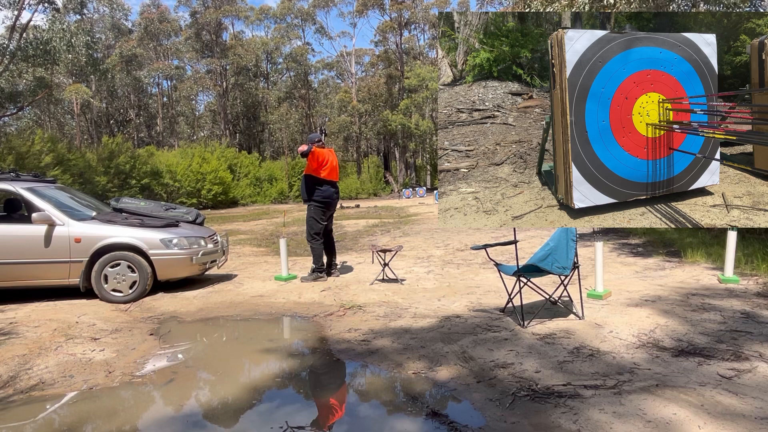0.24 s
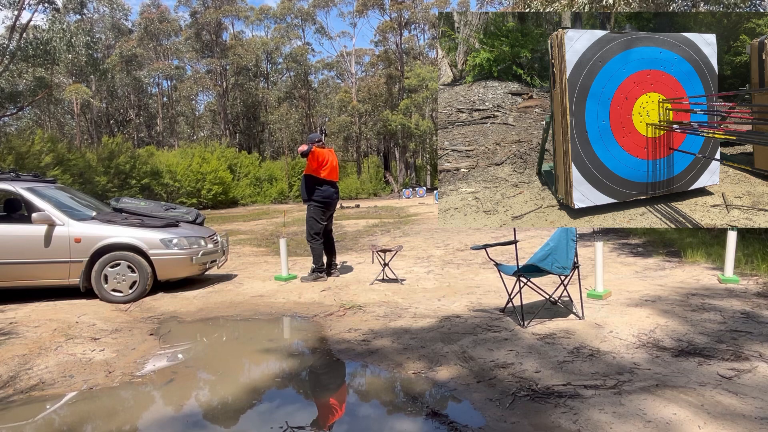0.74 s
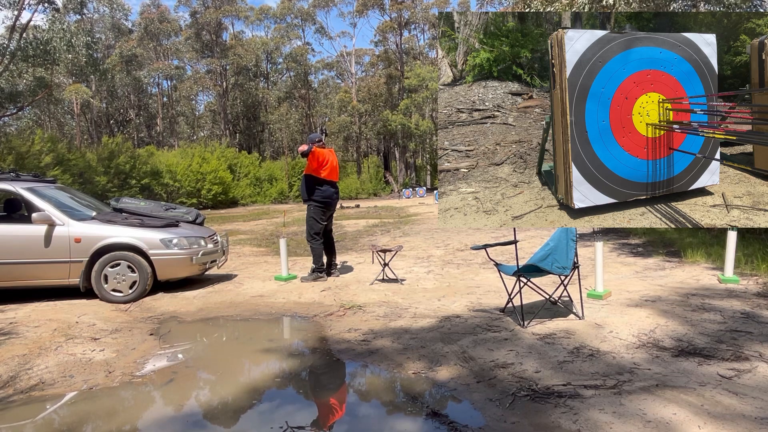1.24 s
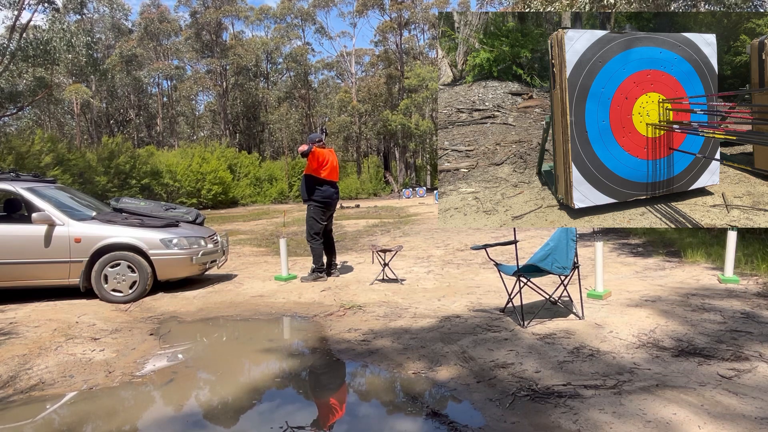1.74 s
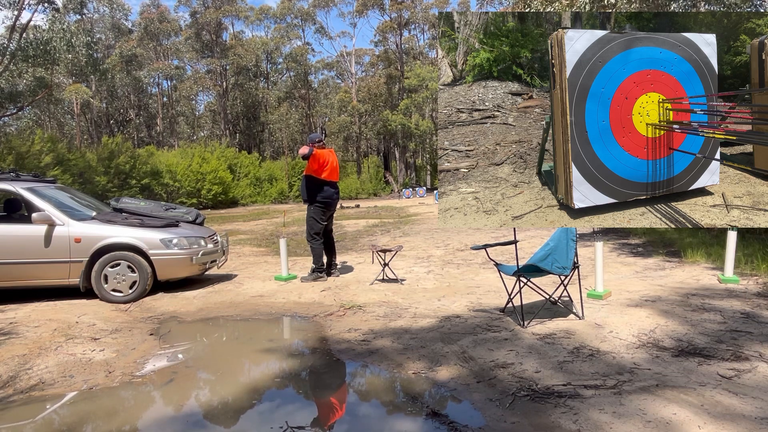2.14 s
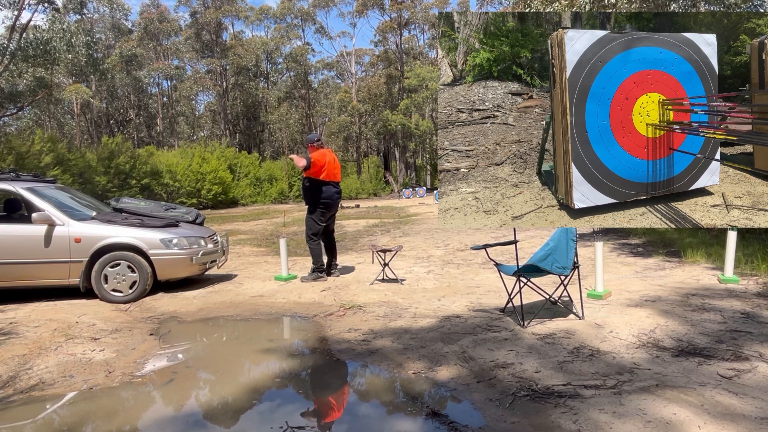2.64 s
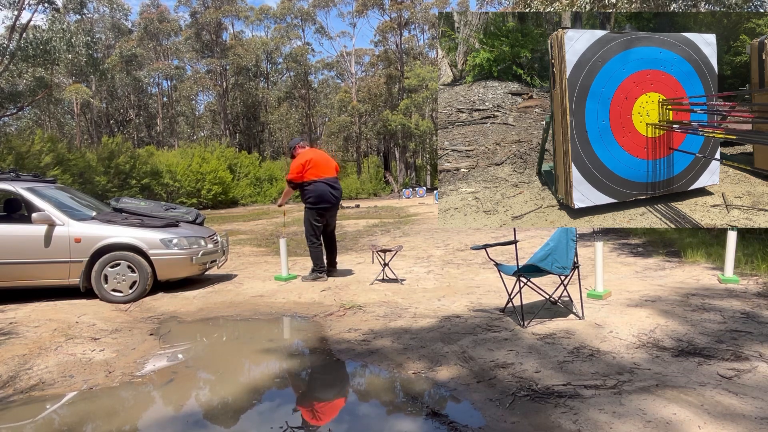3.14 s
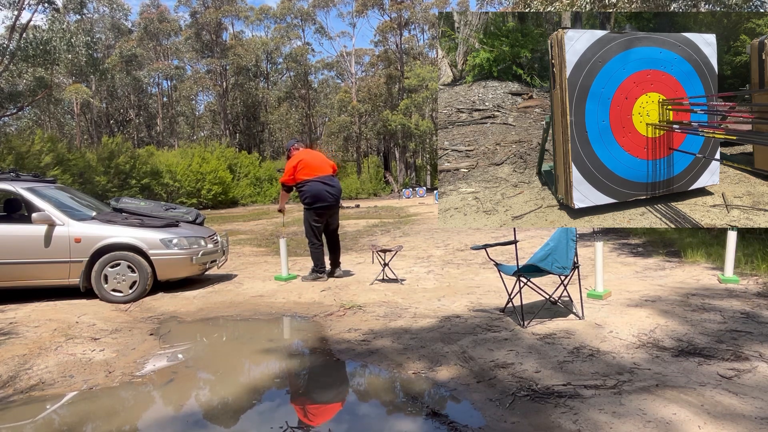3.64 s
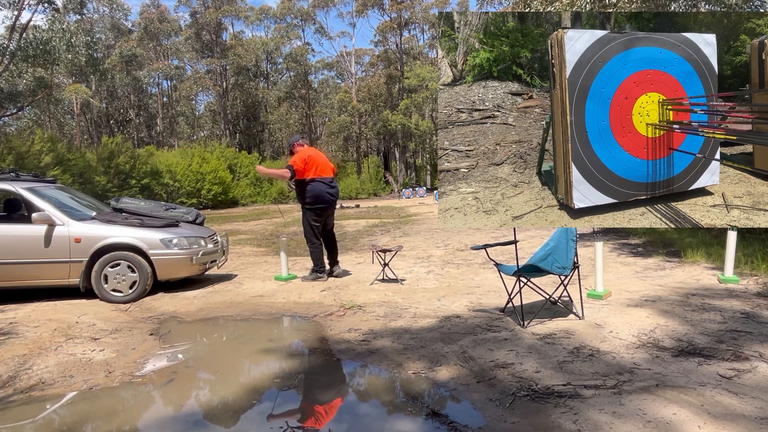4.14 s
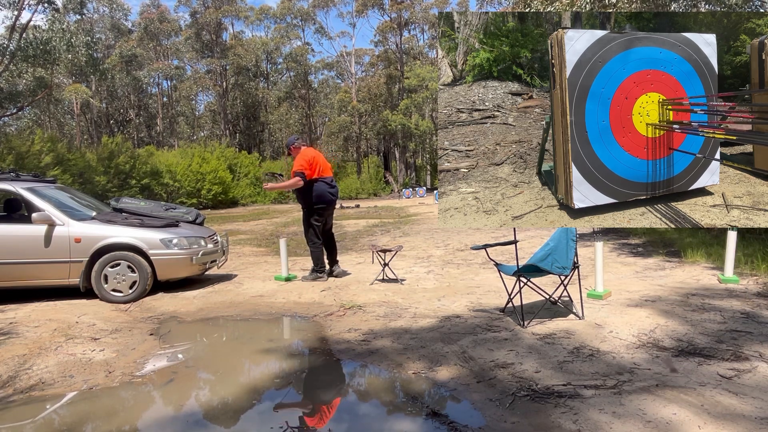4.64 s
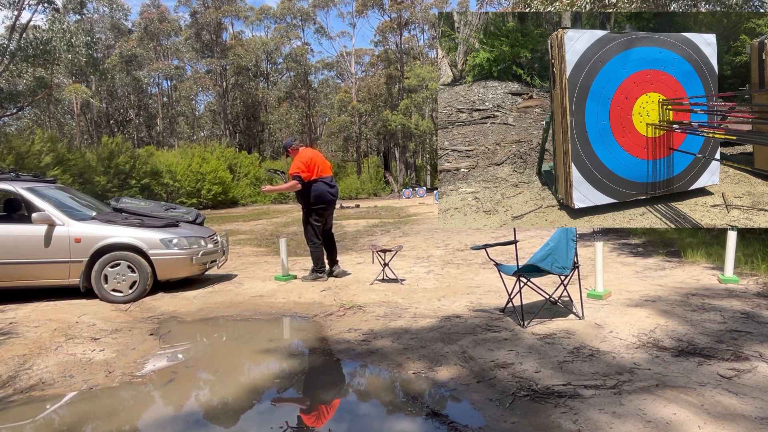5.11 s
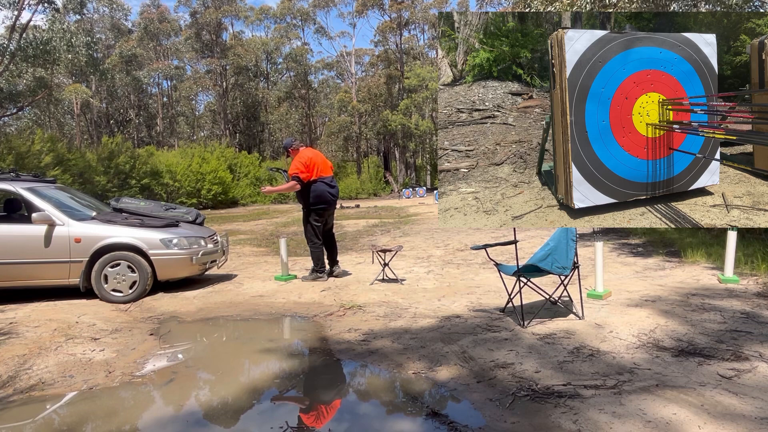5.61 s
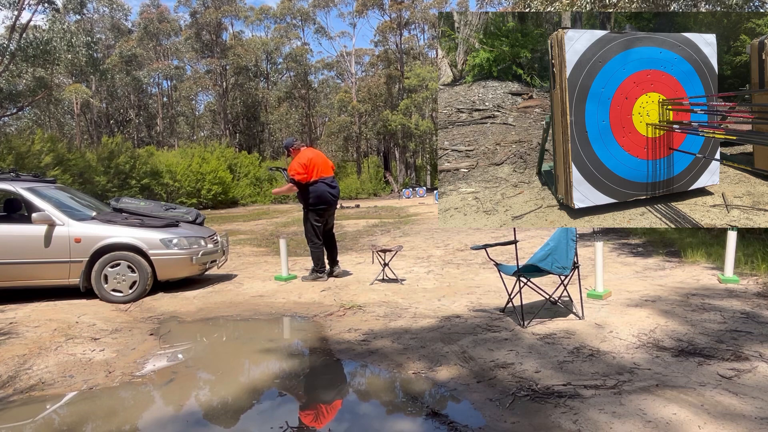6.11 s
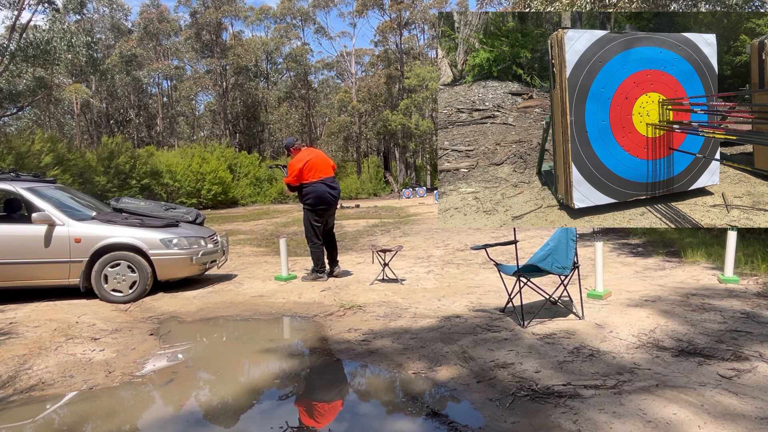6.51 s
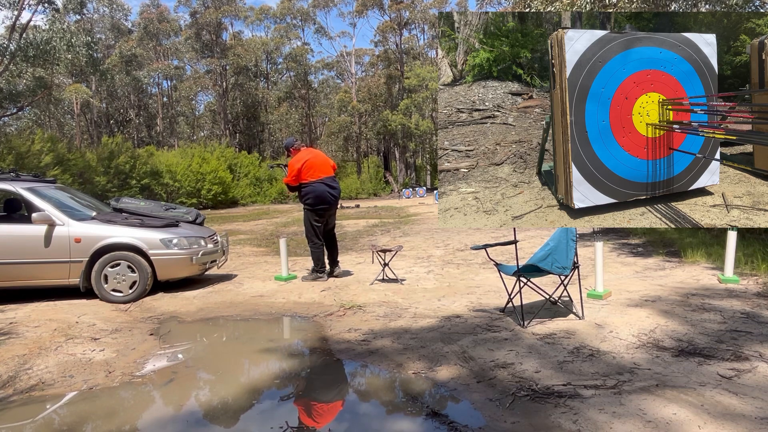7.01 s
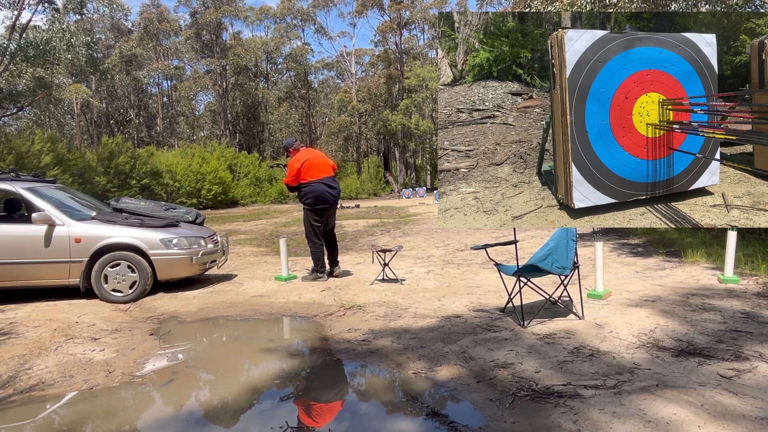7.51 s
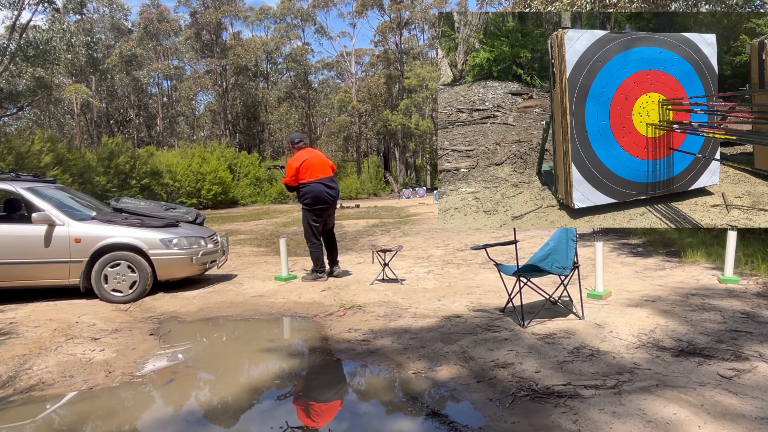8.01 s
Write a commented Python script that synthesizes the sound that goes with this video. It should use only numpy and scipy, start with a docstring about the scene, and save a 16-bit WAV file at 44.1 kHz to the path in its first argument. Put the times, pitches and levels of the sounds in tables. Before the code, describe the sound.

A songbird trills over a faint frog-like chorus; a bow snaps, an arrow hisses and cracks loudly into a target, booming through trees.

```python
"""A songbird trills over a far chorus, perhaps frogs; then an archer shoots one arrow on a bush range.
The bow snaps (noise bursts, struck modes), the arrow hisses and cracks into the boss, whose thump rolls
through the trees (decaying noise reflections); later some gear knocks. A microphone behind the archer and
one beside the target hear it at once. The songbird sings two long phrases and a second bird whistles
lower (gliding sines); low air, a hum, leaves, insects and the chorus are steady coloured noise."""
import sys
import numpy as np
from scipy import signal
from scipy.fft import rfft, irfft, next_fast_len
from scipy.io import wavfile
from scipy.ndimage import uniform_filter1d, map_coordinates

SR = 44100
rng = np.random.default_rng(int(sys.argv[2]) if len(sys.argv) > 2 else 0)


def put_to_file(sound):
    """Save the sound as 16-bit audio at rate SR, in the file named by the first command-line argument."""
    columns = np.atleast_2d(sound).T  # one column per channel
    safe = np.clip(columns, -1, 1)
    whole_steps = np.round(safe * 32767)
    wavfile.write(sys.argv[1], SR, whole_steps.astype(np.int16))


N = 364250

# Arrow, rest and fittings during the shot. Each row: start in seconds, clack in dB, hiss in dB.
BOW_CLACKS = [(1.9627, -56, -49), (1.9775, -56, -54.5), (1.9909, -41, -49.5), (1.9936, -26, -44.5),
              (2.0056, -38, -46.5), (2.108, -48, -49.5), (2.1157, -50, -53.5)]
# Colour of hisses and scuffs. Each row: frequency in Hz, relative density in dB per Hz.
HISS_COLOUR = [(1500, -19), (3000, 0.5), (5500, 4.5), (8000, -5.5), (11200, -2.5), (12500, -19),
               (15500, -16.5)]
# Arrow tip tearing into the target. Each row: start in seconds, relative level in dB, T60 in seconds.
TIP_CRACKS = [(2.3638, -10.5, 0.011), (2.3652, -9, 0.0048), (2.3659, -4.5, 0.0063), (2.3675, -16.5, 0.016),
              (2.3957, -35.5, .014)]
# The boss is driven back, then knocks on its stand. Each row: start in seconds, relative level in dB.
BOSS_BLOWS = [(2.366, 0.5), (2.396, -13)]


def from_db(db):
    """Decibels to gain."""
    return 10 ** (np.asarray(db) / 20)


def rms_one(x):
    """Scale to rms 1."""
    return x / np.sqrt(np.mean(x ** 2) + 1e-20)


def at_hz(points, hz):
    """Read a table on a log-frequency axis."""
    f, value = np.transpose(points)
    return np.interp(np.log(np.maximum(hz, 1)), np.log(f), value)


def pan(left_db):
    """Left and right gains; left_db is left level minus right level."""
    return from_db(np.array([[left_db], [-left_db]]) / 2)


def add(out, start_s, sound):
    """Mix a sound in at start_s."""
    start = round(start_s * SR)
    out[..., start:start + sound.shape[-1]] += sound[..., :N - start]


def noise(spectrum, alike, size):
    """Stereo noise of a given colour and left-right correlation; rms 1."""
    fast = next_fast_len(size)
    alike = np.clip(alike, -1, 1)
    gain = from_db(at_hz(spectrum, np.fft.rfftfreq(fast, 1 / SR)))
    white = rng.standard_normal((2, fast))
    mid, side = irfft(rfft(white) * gain, fast)[:, :size]
    return rms_one(np.sqrt(1 + alike) * mid + np.sqrt(1 - alike) * np.array([side, -side]))


def drift(rate_hz, size):
    """Random values, rate_hz of them a second, joined by straight lines; spread near 1."""
    steps = np.arange(size) / SR * rate_hz
    return np.interp(steps, np.arange(4096), rng.standard_normal(4096))


def burst(spectrum, t60_s, alike, attack_s=.00008):
    """Coloured noise with a fast attack and exponential decay, like many resonances dying together."""
    t = np.arange(SR // 2) / SR
    return noise(spectrum, alike, size=len(t)) * from_db(-60 * t / t60_s) * (1 - np.exp(-t / attack_s))


def ring(modes):
    """A struck body: decaying sines, neighbours in opposite sign."""
    t = np.arange(SR // 2) / SR
    out = np.zeros(len(t))
    for k, (hz, db, t60_s) in enumerate(modes):
        out += (-1) ** k * from_db(db - 60 * t / t60_s) * np.sin(2 * np.pi * hz * t)
    return out


def scatter(x, colour, decay, build_s, alike, patchy_db=0):
    """Countless reflections from trunks and leaves; each octave dies at its own rate, in clumps if patchy."""
    t = np.arange(int(1.2 * SR)) / SR
    echo = 0
    edges_hz = 31 * 2. ** np.arange(10)
    for low, high in zip(edges_hz, edges_hz[1:]):
        hz = np.sqrt(low * high)
        clumps = drift(4 * np.sqrt(hz), len(t))
        fall_db = patchy_db * clumps - 60 * t / at_hz(decay, hz)
        shape = from_db(fall_db) * (1 - np.exp(-t / build_s))
        octave = signal.butter(2, [low, high], "band", fs=SR, output="sos")
        band = signal.sosfilt(octave, noise([(1, 0), (SR, 0)], alike, size=len(t)))
        echo = echo + from_db(at_hz(colour, hz)) * band * shape / np.linalg.norm(shape)
    return signal.fftconvolve(x, echo, axes=1)[:, :N]


def bow():
    """The arrow hisses off the rest, the string slaps home and the limbs thud; a softer rebound follows."""
    # Each row: frequency in Hz, relative density in dB per Hz.
    clack_colour = [(210, -31), (350, -12), (522, -9.5), (712, 0), (1180, -2.5), (1540, -12), (2100, -1),
                    (2260, -9.5), (2430, 1.5), (2650, -8.5), (5240, -24), (8670, -30), (10700, -21.5),
                    (12000, -36.5), (15600, -56), (22000, -120)]
    # The string slaps the limbs. Each row: start in seconds, relative level in dB.
    string_slaps = [(1.9935, -37), (2.0035, -47.5), (2.0185, -41.5), (2.1092, -47.5), (2.1163, -43),
                    (2.1235, -54)]
    # What each slap rings with. Each row: frequency in Hz, relative level in dB, T60 in seconds.
    string_modes = [(575, -1.5, .045), (658, -3.5, 0.046), (719.5, 0.5, .055), (775, 1.5, 0.058),
                    (837, -6, .04), (920, -5.5, .04), (967, -1, .045), (1080, -7.5, 0.045),
                    (1150, -5, 0.038), (1248, -8.5, .04)]
    # The limbs stop, then rebound. Each row: start in seconds, relative level in dB.
    limb_thuds = [(1.9969, -32), (2.11, -34.5)]
    # Limbs and riser. Each row: frequency in Hz, relative level in dB, T60 in seconds.
    limb_modes = [(88, -2.5, .085), (134, 2, 0.035), (205, -5, 0.051), (280, -7.5, .05), (404, -9.5, .05)]
    out, body = np.zeros((2, 2, N))
    for start_s, clack_db, hiss_db in BOW_CLACKS:
        add(out, start_s, from_db(clack_db) * burst(clack_colour, t60_s=0.05, alike=.4) * pan(4.3))
        add(out, start_s, from_db(hiss_db) * burst(HISS_COLOUR, t60_s=0.3, alike=0.18) * pan(-1.2))
    for start_s, db in string_slaps:
        add(body, start_s, from_db(db) * ring(string_modes) * pan(2.494))
    for start_s, db in limb_thuds:
        add(body, start_s, from_db(db) * ring(limb_modes))
    out = out + body
    near = scatter(out, [(200, -16), (1000, -13), (4500, -2.0), (12000, -15.5)],
                   [(200, 0.22), (5000, 0.1), (12000, 0.51)], build_s=0.0026, alike=0.19, patchy_db=1.0)
    trees = scatter(body, [(100, -18), (300, -9.5), (1000, -16)], [(100, .7), (1000, .65)],
                    build_s=.03, alike=.5)
    return out + near + trees


def arrow(near_s, falloff):
    """The vanes hiss, swelling steeply as the arrow closes on the target's microphone."""
    leaves_bow_s, lands_s = BOW_CLACKS[3][0], TIP_CRACKS[0][0]
    to_go_s = np.arange(int((lands_s - leaves_bow_s) * SR))[::-1] / SR
    out = np.zeros((2, N))
    vane_colour = [(400, -7.0), (2000, 4.5), (6000, 0), (9000, -15.0), (15000, -16.0)]
    vanes = noise(vane_colour, alike=.4, size=len(to_go_s))
    add(out, leaves_bow_s, from_db(-26.0) * vanes * (near_s / (near_s + to_go_s)) ** falloff)
    return out


def shove(width_s):
    """One slow push and pull of air as the face of the boss gives way."""
    u = np.arange(SR // 20) / SR / width_s - 3
    return -u * np.exp(-u ** 2 / 2)


def target():
    """The tip bursts through face and packing within a few milliseconds; the whole boss then booms."""
    # Each row: frequency in Hz, relative density in dB per Hz.
    crack_colour = [(400, -22.5), (700, -10), (950, -1.5), (1260, -1.5), (1800, -2.5), (2600, -2.5),
                    (3200, -17.5), (3800, -8), (5200, -1.5), (6400, 2), (7400, 1), (9200, -12.5),
                    (11000, -5), (13200, -26.5), (16000, -23.5)]
    # Boss and stand. Each row: frequency in Hz, relative level in dB, T60 in seconds.
    boss_modes = [(48, -41.5, 0.2), (76.5, -28, 0.16), (105, -26, 0.16), (180, -17.5, 0.072),
                  (228, -7.5, 0.063), (287.5, -13, 0.07), (399.8, -17.5, 0.05), (448.5, -22, 0.045),
                  (508, -30, 0.024), (820.4, -30.5, .035), (1240, -20, 0.025), (1590, -28.5, 0.022),
                  (1820, -31.5, 0.037), (2570, -27.5, 0.019)]
    # Dull crush of the packing. Each row: frequency in Hz, relative density in dB per Hz.
    packing_colour = [(25, -7.5), (60, -1), (130, 5), (200, 4.5), (330, 5), (480, -7.5), (650, -11),
                      (1100, -16), (2000, -39.5)]
    # The stand rattles once the boss has struck it. Each row: start in seconds, relative level in dB.
    stand_rattles = [(2.4002, -26.5), (2.452, -41.5), (2.488, -64)]
    # Frame of the stand. Each row: frequency in Hz, relative level in dB, T60 in seconds.
    stand_modes = [(307.6, -1.5, 0.072), (364.7, -6, 0.031), (439.5, 1.5, 0.049), (500, -5.5, 0.024)]
    out, crush = np.zeros((2, 2, N))
    for start_s, db, t60_s in TIP_CRACKS:
        add(out, start_s, from_db(db) * burst(crack_colour, t60_s, alike=0.2))
    for start_s, db in BOSS_BLOWS:
        add(out, start_s, from_db(db) * ring(boss_modes) * pan(.5))
        add(out, start_s, from_db(db - 25.0) * shove(width_s=0.0035))
        packing = burst(packing_colour, t60_s=0.2, alike=1.0, attack_s=0.0011)
        add(crush, start_s, from_db(db - 24.5) * packing)
    for start_s, db in stand_rattles:
        add(out, start_s, from_db(db) * ring(stand_modes))
    return out + crush + forest_roll()


def forest_roll():
    """The hit leaves the boss as one sharp pulse, which the trees return as a rough, uneven boom."""
    # Each row: frequency in Hz, relative level in dB.
    roll_colour = [(45, 3), (90, 10.5), (175, 15.5), (350, 4.5), (700, -5), (1400, -7.5), (2800, -12.5),
                   (5600, -9.5), (11000, -22.5)]
    # Each row: frequency in Hz, T60 in seconds.
    roll_decay = [(50, 2.4), (170, 1.3), (350, .92), (700, 0.97), (1500, 1.2), (5000, 0.6), (11000, 0.44)]
    top_hz = 11400   # the roll is dull: little is left above this
    pulse = np.zeros((2, N))
    add(pulse, BOSS_BLOWS[0][0], np.ones(1))
    pulse = signal.sosfilt(signal.butter(8, top_hz, fs=SR, output="sos"), pulse + 1e-18)
    roll = scatter(pulse, roll_colour, roll_decay, build_s=.02, alike=0.37, patchy_db=1.5)
    return roll + far_echoes(pulse, smear_s=0.0094)


def far_echoes(x, smear_s):
    """Banks and stands of trees each send back one dull, smeared echo."""
    # Each row: delay in seconds, relative level in dB.
    echo_delays = [(.083, 0.5), (0.146, 0), (.25, -17), (.315, -12.5), (.475, -13), (0.536, -14),
                   (.72, -19)]
    # Each row: frequency in Hz, relative level in dB.
    echo_colour = [(60, -4.5), (150, 0.5), (300, 2.5), (480, -13.5), (950, -21), (1500, -28), (4000, -33),
                   (9000, -54.5)]
    t = np.arange(SR // 8) / SR
    swell = t * np.exp(-t / smear_s)
    swell = swell / np.linalg.norm(swell)
    response = np.zeros((2, N))
    for delay_s, db in echo_delays:
        add(response, delay_s, from_db(db) * noise([(1, 0), (SR, 0)], alike=.6, size=len(t)) * swell)
    size = next_fast_len(N + SR)
    gain = from_db(at_hz(echo_colour, np.fft.rfftfreq(size, 1 / SR)))
    return irfft(rfft(x, size) * rfft(response, size) * gain, size)[:, :N]


def gear():
    """Light knocks and scuffs as the archer reaches for the next arrow, and a soft, deep bump."""
    # Gear being handled. Each row: start in seconds, knock in dB, hiss in dB.
    gear_knocks = [(2.705, -60.5, -81), (2.744, -55, -82), (3.274, -58.5, -73), (3.9004, -40, -47),
                   (3.904, -43, -69), (3.974, -62, -71), (4.02, -58, -65), (7.842, -87.5, -53)]
    # Each row: frequency in Hz, relative density in dB per Hz.
    knock_colour = [(76, -33.5), (130, -31), (234, -3), (308, -9), (420, -7), (646, -9.5), (1310, -7),
                    (1820, -12), (2990, -4), (3440, -47), (3810, -46), (6280, -21), (8000, -38),
                    (10400, -45), (17600, -120)]
    # Each row: frequency in Hz, relative level in dB, T60 in seconds.
    knock_modes = [(198.3, -15.5, 0.29), (1260, -2, 0.027), (2330, -8, .02), (3050, -7, 0.039)]
    # The archer shifts. Each row: frequency in Hz, relative level in dB, T60 in seconds.
    bump_modes = [(66.9, 3, 0.16), (88, -6, 0.08)]
    bump_s, bump_db = 4.145, -59
    out, bump = np.zeros((2, 2, N))
    for start_s, knock_db, hiss_db in gear_knocks:
        knock = burst(knock_colour, t60_s=0.042, alike=0.56, attack_s=0.0011) + ring(knock_modes)
        add(out, start_s, from_db(knock_db) * knock)
        add(out, start_s, from_db(hiss_db) * burst(HISS_COLOUR, t60_s=0.056, alike=0.089))
    add(bump, bump_s, from_db(bump_db) * ring(bump_modes))
    near = scatter(out, [(200, -11), (4000, -5), (11000, -3)], [(200, 0.21), (8000, 0.4)],
                   build_s=0.0036, alike=.2, patchy_db=13)
    return out + bump + near


def birds():
    """The songbird is louder on the right; the further a bird, the more of it comes by way of the trees."""
    # Second bird. Each row: start and length in seconds, four pitches along the note in Hz,
    # relative level in dB.
    low_notes = [(4.3, 0.11, 3270, 3480, 3760, 3760, -68.5), (4.875, 0.17, 2460, 3106, 3360, 3435, -53),
                 (5.166, 0.049, 2070, 2760, 3506, 4530, -47.5), (5.272, 0.079, 3320, 2555, 2260, 2020, -50),
                 (5.452, 0.11, 2410, 2540, 2690, 2804, -45.5),
                 (5.683, 0.076, 2002, 2770, 3920, 5320, -44.5)]
    # Thin glides from deep in the trees. Each row: start and length in seconds,
    # five pitches along the note in Hz, relative level in dB.
    far_notes = [(3.034, 0.013, 6990, 5660, 6960, 5870, 7020, -60.5),
                 (3.275, 0.051, 6420, 6580, 6050, 6560, 6500, -69.5),
                 (3.404, 0.021, 6130, 5970, 5650, 5300, 5180, -64),
                 (3.428, 0.092, 5600, 5440, 5650, 5600, 5740, -67),
                 (3.592, 0.071, 6130, 6500, 6900, 6520, 6600, -66),
                 (3.729, 0.064, 6100, 5800, 5340, 4770, 5280, -64),
                 (3.86, 0.069, 5960, 6220, 6780, 6330, 7160, -64.5),
                 (3.97, 0.085, 6070, 5760, 5140, 4910, 5400, -64),
                 (4.121, 0.094, 7150, 7560, 8230, 7540, 7500, -68.5),
                 (4.45, 0.046, 6220, 6070, 5950, 5795, 5330, -60),
                 (4.655, .06, 6040, 5900, 5500, 5800, 5600, -61)]
    slurred, zigzag = slurred_song(), zigzag_song()
    low = slurs(low_notes, taper=0.5, waver=0.0052, flutter_db=6.0, throat_db=5.5) * from_db(-3.0)
    far = slurs(far_notes, taper=0.12, waver=0.0242, flutter_db=3.5, throat_db=-1.5) * pan(-8.0)

    song = slurred + zigzag
    direct = place(song + near_echoes(song), left_db=-10.5, lead_s=.00047)
    direct = direct + place(low, left_db=0.0, lead_s=.00034)

    spread = (slurred * from_db(-5.0) + zigzag * from_db(-6.5)) * pan(-3.0)
    spread = spread + low * from_db(3.0) * pan(-.7)
    trees = scatter(spread, [(2800, -6.5), (5600, -0.5), (11000, 3.5)], [(2500, 0.54), (7000, 0.88)],
                    build_s=0.0013, alike=0.11, patchy_db=0.5)
    depths = scatter(far, [(4000, 5.2), (8000, 3.2)], [(4000, 0.75), (8000, 0.82)],
                     build_s=0.0024, alike=0.12)
    return direct + far * from_db(-1.0) + trees + depths


# The songbird's two phrases each run through three motifs, every one repeated:
# dip-buzz-hold, then ripple-slide-buzz, then cascade-hook-arch.
def slurred_song():
    """The songbird's smooth syllables: dips, holds, slides, hooks, arches and flourishes."""
    # Shapes: semitones from the note's pitch, evenly spaced in time.
    # Notes, each row: start and length in seconds, pitch in Hz, relative level in dB.
    # Whistles that dip and recover.
    dip_shape = [3.6, 2, -1.3, -5.6, -1, 1.4, 1.3, .7, -.5]
    dip_notes = [(0.2234, 0.056, 5340, -57.5), (0.4847, 0.039, 5690, -49), (0.7549, 0.046, 5670, -48.5),
                 (1.0055, 0.036, 5690, -44), (4.2263, 0.055, 5530, -47), (4.498, 0.05, 5980, -43.5),
                 (4.7791, 0.045, 5660, -40.5), (5.0691, 0.043, 5930, -38)]
    # Whistles that leap up and stay high.
    hold_shape = [-5, -.6, 1, -.1, .7, -.2, .4, -.3, .1, -.3, -.2]
    hold_notes = [(0.3796, 0.063, 7000, -63.5), (0.637, 0.055, 7180, -61.5), (0.9058, 0.046, 6960, -58),
                  (4.371, 0.069, 7180, -51.5), (4.6508, 0.074, 7490, -50), (4.9274, 0.077, 7530, -50)]
    # Whistles that slide down.
    slide_shape = [1.4, 2.4, .3, -.3, -.6, -1]
    slide_notes = [(1.2133, 0.036, 5570, -49), (1.4057, 0.042, 5680, -47), (1.591, 0.049, 5630, -47.5),
                   (5.2722, 0.032, 5890, -39), (5.456, 0.046, 5740, -42), (5.6696, 0.032, 5420, -37.5)]
    # Short rounded whistles.
    arch_shape = [-2.2, -.3, .6, .5, -.4, -1.5]
    arch_notes = [(1.852, 0.025, 5710, -50), (2.2147, 0.026, 5580, -50.5), (2.5833, 0.023, 5600, -52),
                  (2.768, 0.035, 5790, -63.5), (5.9445, 0.024, 6170, -40.5), (6.1225, 0.028, 6200, -41),
                  (6.303, 0.027, 6200, -41.5), (6.435, 0.021, 4400, -46), (6.479, 0.027, 5840, -43.5),
                  (6.6565, 0.023, 5950, -40), (6.804, 0.017, 4090, -49), (6.847, 0.025, 6240, -53),
                  (7.002, 0.0084, 4330, -49), (7.196, 0.016, 4110, -54)]
    # Freer sweeps, mostly upward, as the song winds down. Each row: start and length in seconds,
    # five pitches along the note in Hz, relative level in dB.
    flourish_notes = [(7.038, 0.018, 3750, 4500, 5360, 6650, 8200, -46),
                      (7.057, 0.0032, 7850, 6800, 5900, 5050, 4200, -46),
                      (7.244, .026, 5590, 5950, 6300, 6530, 5250, -53.5),
                      (7.428, 0.017, 4014, 4800, 5170, 5620, 5800, -51.5)]
    out = whistles(dip_notes, dip_shape, taper=0.072, throat_db=38.0, swell_db=1)
    out += whistles(hold_notes, hold_shape, taper=0.11, throat_db=7.0)
    out += whistles(slide_notes, slide_shape, taper=.22, throat_db=17.5)
    out += hooks(taper=0.42, peak_db=9.5, rise_db=-7.0) * from_db(-5.5)
    out += whistles(arch_notes, arch_shape, taper=0.56, throat_db=24.0)
    out += slurs(flourish_notes, taper=0.28, waver=0.0098, flutter_db=3.5, throat_db=27)
    return out * from_db(-2.0)


def zigzag_song():
    """The songbird's fast zigzag syllables: buzzes, ripples and cascades."""
    out = buzzes(sweep_hz=4780, narrowing=0.22, unsteady=.12, taper=0.52) * from_db(-2.5)
    out += ripples(sweep_hz=2720, lead_s=0.00808, sharpness=1.5, peak_dip_db=15.5, taper=0.27)
    out += cascades(peak_dip_db=10, break_db=7, taper=0.07)
    return out * from_db(-2.0)


def tone(hz, level_db, taper, waver, flutter_db):
    """A bird's near-pure note, swelling in and out, never quite steady."""
    size = len(hz)
    phase = 2 * np.pi * np.cumsum(hz * (1 + waver * drift(350, size))) / SR
    swell = signal.windows.tukey(size, np.clip(taper, 0, 1))
    return np.sqrt(2) * from_db(level_db + flutter_db * drift(150, size)) * swell * np.sin(phase)


def slurs(notes, taper, waver, flutter_db, throat_db, swell_db=0):
    """Notes glide through their pitches, losing throat_db per octave away from the median pitch."""
    out = np.zeros(N)
    for start_s, length_s, *pitches_hz, db in notes:
        along = np.linspace(0, len(pitches_hz) - 1, int(length_s * SR))
        hz = map_coordinates(np.array(pitches_hz, float), [along], order=3, mode="nearest")
        away_octaves = np.abs(np.log2(hz / np.median(hz)))
        level_db = db - throat_db * away_octaves + swell_db * (along / along[-1] - .5)
        add(out, start_s, tone(hz, level_db, taper, waver, flutter_db))
    return out


def whistles(notes, shape, taper, throat_db, swell_db=0):
    """One syllable sung again and again, stretched to each note's length and moved to its pitch."""
    ratios = 2 ** (np.array(shape) / 12)
    sung = [(start_s, length_s, *(hz * ratios), db) for start_s, length_s, hz, db in notes]
    return slurs(sung, taper, waver=0.015, flutter_db=2.67, throat_db=throat_db, swell_db=swell_db)


def hooks(taper, peak_db, rise_db):
    """A quick flick, soft on the way up and full on the way down, then falls towards a low tail."""
    # Each row: start and length in seconds, peak and tail in Hz, relative level in dB.
    hook_notes = [(1.788, 0.028, 5750, 3580, -55), (2.16, 0.051, 5430, 4100, -55.5),
                  (2.532, 0.017, 5800, 3690, -52), (2.709, 0.036, 5770, 4020, -57.5),
                  (5.886, 0.024, 6000, 4050, -45), (6.066, 0.021, 6150, 3964, -45),
                  (6.24, 0.022, 6280, 3474, -49.5), (6.42, 0.018, 6460, 4000, -52.5),
                  (6.602, 0.027, 6560, 4190, -46), (6.784, 0.013, 6020, 3700, -46),
                  (6.978, 0.013, 6390, 3940, -53), (7.177, 0.013, 6240, 3820, -51),
                  (7.365, 0.014, 5810, 3705, -54), (7.555, 0.016, 5560, 3590, -61)]
    rise_s, fall_s, settle_s = .0065, .0065, .008
    start_share, knee_share = 0.42, .66   # pitch before and after the flick, as shares of the peak
    out = np.zeros(N)
    corners_s = np.cumsum([0, rise_s, fall_s, settle_s])
    for start_s, length_s, peak_hz, tail_hz, db in hook_notes:
        t = np.arange(int(length_s * SR)) / SR
        corners_hz = [start_share * peak_hz, peak_hz, knee_share * peak_hz, tail_hz]
        hz = uniform_filter1d(np.interp(t, corners_s, corners_hz), size=90)
        level_db = db + np.interp(t, corners_s, [rise_db, peak_db, 0, 0])
        add(out, start_s, tone(hz, level_db, taper, waver=0.01202, flutter_db=3.0))
    return out


def zigzag_shape(t, rate, sharpness):
    """1 at each peak of a zigzag, 0 in its troughs; sharper means thinner peaks."""
    return (1 - np.abs(np.sin(np.pi * rate * t))) ** sharpness


def thinning_db(hz):
    """Level lost at the top and the bottom of the songbird's range."""
    bottom_hz, top_hz, fade_db_per_octave = 5050, 6770, 34.5
    above_octaves = np.maximum(np.log2(hz / top_hz), 0)
    below_octaves = np.maximum(np.log2(bottom_hz / hz), 0)
    return fade_db_per_octave * (above_octaves + below_octaves)


def buzzes(sweep_hz, narrowing, unsteady, taper):
    """The pitch saws unevenly up and down with sharp turns, over a narrowing range."""
    # Wide, low zigzags. Each row: start and length in seconds, base pitch in Hz, relative level in dB.
    buzz_notes = [(0.1416, 0.028, 5530, -57.5), (0.334, 0.021, 4750, -71), (0.566, 0.024, 4220, -60),
                  (0.834, 0.029, 4460, -57.5), (1.075, 0.053, 4330, -54.5), (1.271, 0.043, 5070, -51),
                  (1.469, 0.031, 4970, -53.5), (1.658, 0.047, 5160, -58.5), (4.307, 0.034, 4400, -47.5),
                  (4.577, 0.034, 4560, -49), (4.86, 0.0341, 4300, -46), (5.138, 0.036, 4480, -45),
                  (5.335, 0.021, 4880, -44.5), (5.529, 0.025, 5080, -40.5), (5.7455, 0.052, 5100, -43)]
    mean_sweeps_per_s, first_peak_s = 81, .0056
    out = np.zeros(N)
    for start_s, length_s, base_hz, db in buzz_notes:
        t = np.arange(int(length_s * SR)) / SR
        uneven_s = np.cumsum(1 + unsteady * drift(80, len(t))) / SR
        cycles = mean_sweeps_per_s * (uneven_s - first_peak_s)
        saw = uniform_filter1d(np.abs(2 * (cycles % 1) - 1), size=60)
        hz = base_hz + sweep_hz * ((1 - narrowing * t / length_s) * saw - .08)
        add(out, start_s, tone(hz, db - thinning_db(hz), taper, waver=0.012, flutter_db=4.5))
    return out


def ripples(sweep_hz, lead_s, sharpness, peak_dip_db, taper):
    """After a short lead-in the pitch flicks to sharp peaks; it is loudest in the troughs."""
    # Slower zigzags at the top of the voice. Each row: start and length in seconds, trough in Hz,
    # sweeps per second, relative level in dB.
    ripple_notes = [(1.135, 0.05, 7470, 110, -57.5), (1.337, 0.045, 7340, 60, -59.5),
                    (1.53, 0.05, 7180, 77, -58), (5.1986, 0.044, 7170, 65, -47.5),
                    (5.383, 0.054, 7730, 63, -49), (5.591, 0.041, 7540, 49, -44.5)]
    out = np.zeros(N)
    for start_s, length_s, trough_hz, rate, db in ripple_notes:
        t = np.arange(int(length_s * SR)) / SR
        flick = zigzag_shape(t - lead_s, rate, sharpness)
        hz = trough_hz + sweep_hz * flick
        add(out, start_s, tone(hz, db - peak_dip_db * flick, taper, waver=0.012, flutter_db=2.5))
    return out


def cascades(peak_dip_db, break_db, taper):
    """Sinking strokes, each from a thin peak into a full trough; the voice breaks on the way back up."""
    # Zigzags that tumble down. Each row: start and length in seconds, first and last peak in Hz,
    # first and last trough in Hz, sweeps per second, sharpness of the peaks, relative level in dB.
    cascade_notes = [(1.722, 0.045, 9800, 5940, 5920, 4390, 98, 1.9, -53.5),
                     (1.901, 0.037, 9800, 5930, 6440, 4160, 93, 2, -56.5),
                     (2.091, 0.04, 9800, 5480, 6230, 4190, 113, 1.9, -52),
                     (2.267, 0.046, 9500, 5200, 7100, 4250, 78, 1.9, -59),
                     (2.47, 0.037, 9500, 5500, 6900, 4520, 85, 2, -56.5),
                     (2.637, 0.065, 9500, 5480, 6950, 4590, 68, 2, -64.5),
                     (5.823, 0.039, 10600, 6920, 6975, 5670, 64, 1.65, -43),
                     (5.9975, 0.044, 10800, 4840, 7060, 4520, 77, 2.1, -44),
                     (6.178, 0.044, 11000, 5180, 7360, 4550, 70, 2.2, -47),
                     (6.3583, 0.043, 10500, 5100, 7070, 4500, 76, 2.6, -44.5),
                     (6.5315, .044, 10200, 4680, 7100, 4030, 73, 1.8, -46),
                     (6.713, 0.045, 9500, 4700, 6150, 3860, 87, 1.5, -46),
                     (6.9, 0.054, 10300, 5100, 5440, 3820, 87, 1.4, -48.5),
                     (7.095, 0.05, 9700, 5030, 5770, 3900, 88, 1.4, -49.5),
                     (7.295, 0.044, 9900, 4956, 6780, 3840, 76, 1.7, -54.5),
                     (7.48, 0.046, 9200, 5000, 6260, 3700, 78, 1.9, -58.5)]
    late_curve, stroke_skew = 1.5, 1.5   # how late it sinks; how much longer a stroke falls than it rises
    out = np.zeros(N)
    for start_s, length_s, peak_a, peak_b, trough_a, trough_b, rate, sharpness, db in cascade_notes:
        t = np.arange(int(length_s * SR)) / SR
        late = (t / length_s) ** late_curve
        stroke = (t * rate) % 1
        flick = zigzag_shape(stroke ** stroke_skew, 0.99, sharpness)
        peak_hz = peak_a + (peak_b - peak_a) * late
        trough_hz = trough_a + (trough_b - trough_a) * late
        hz = trough_hz + (peak_hz - trough_hz) * flick
        rising = np.exp(-((stroke - .86) / .09) ** 2)
        level_db = db - .5 * thinning_db(hz) - peak_dip_db * flick - break_db * rising
        add(out, start_s, tone(hz, level_db, taper, waver=0.0076, flutter_db=4.0))
    return out


def near_echoes(x):
    """Early reflections off the ground and near trunks double each quick stroke."""
    # Each row: delay in seconds, relative level in dB.
    reflections = [(.0031, -13), (.0074, -10.5), (0.0127, -13.5)]
    out = np.zeros(N)
    for delay_s, db in reflections:
        add(out, delay_s, from_db(db) * x)
    return out


def place(x, left_db, lead_s):
    """A direct sound on the microphone pair: a level difference, and the left side slightly ahead."""
    left = map_coordinates(x, [np.arange(N) + lead_s * SR], order=3)
    return np.array([left, x]) * pan(left_db)


def bush():
    """Low air, a faint far hum and leaves all round; the far chorus and insects lie to the right."""
    # Colours, each row: frequency in Hz, relative density in dB per Hz.
    air_colour = [(20, -22.5), (45, 1), (90, 4), (170, -4), (280, -8), (390, -11), (560, -14.5), (800, -30),
                  (1200, -30.5), (2500, -52.5)]
    leaf_colour = [(300, 3), (800, 7), (1200, -3.5), (3000, 0.5), (5000, -7.5), (8000, -4.5), (9000, -14),
                   (11500, -16.5), (13000, -35.5), (16000, -35.5)]
    chorus_colour = [(550, -30), (780, -19.5), (950, -29), (1100, -18), (1280, -9.5), (1450, -0.5),
                     (1600, -1), (1720, -3), (1950, -3.5), (2300, -8), (2600, -18), (2950, -29),
                     (4000, -60)]
    insect_colour = [(3000, -13), (4000, -8.5), (4500, -3), (5400, -3.5), (6000, -6.5), (6800, -5.5),
                     (7600, 0.5), (8300, -16.5), (9200, -45.5)]
    hum_colour = [(330, -60.5), (440, -19.5), (467, -12.5), (479, -2), (491, -7), (520, -22.5), (700, -69)]
    air = from_db(-72.5 + 1.2 * drift(6.1, N)) * noise(air_colour, alike=0.74, size=N)
    leaves = from_db(-76.0) * noise(leaf_colour, alike=.05, size=N)
    chorus = from_db(-63.0 + 0.75 * drift(14, N)) * noise(chorus_colour, alike=-0.24, size=N) * pan(-19.0)
    insects = from_db(-78.5) * noise(insect_colour, alike=.05, size=N) * pan(-17.5)
    hum = from_db(-79.5) * noise(hum_colour, alike=.5, size=N)
    return air + hum + leaves + chorus + insects


def scene():
    """The shot amid the sounds of the bush."""
    return bow() + arrow(near_s=0.01, falloff=2.43) + target() + gear() + birds() + bush()


def record(dry):
    """Peaks clip short of full scale, then a steep low-pass cuts the top."""
    cutoff_hz, clip_level = 15900, .8
    low_pass = signal.ellip(10, .2, 90, cutoff_hz, fs=SR, output="sos")
    return signal.sosfilt(low_pass, np.clip(dry, -clip_level, clip_level))


dry = scene()
out = record(dry)
put_to_file(out)
```